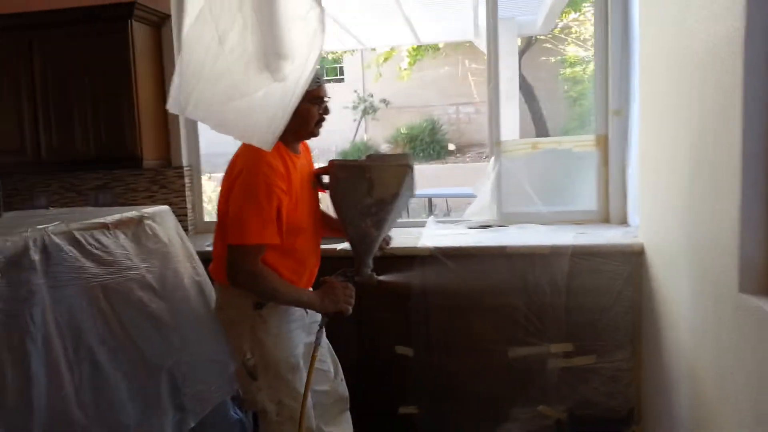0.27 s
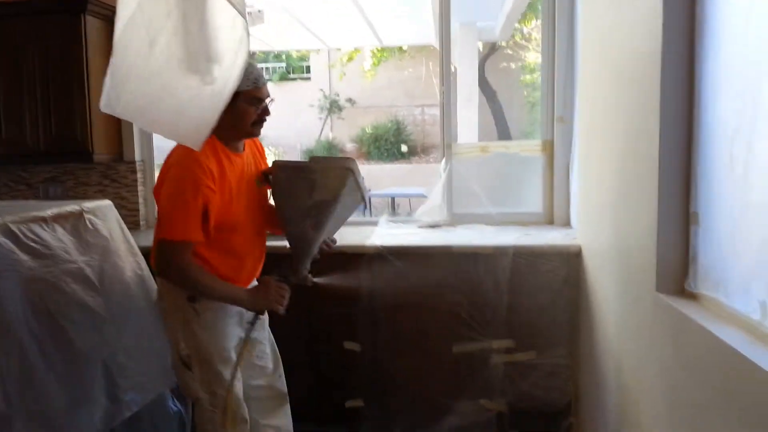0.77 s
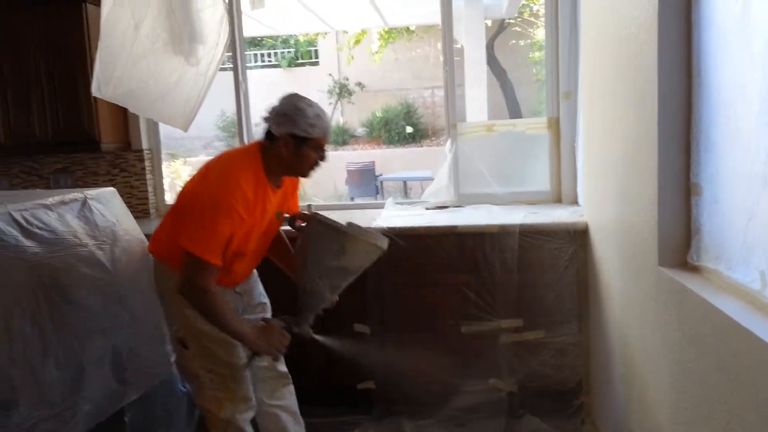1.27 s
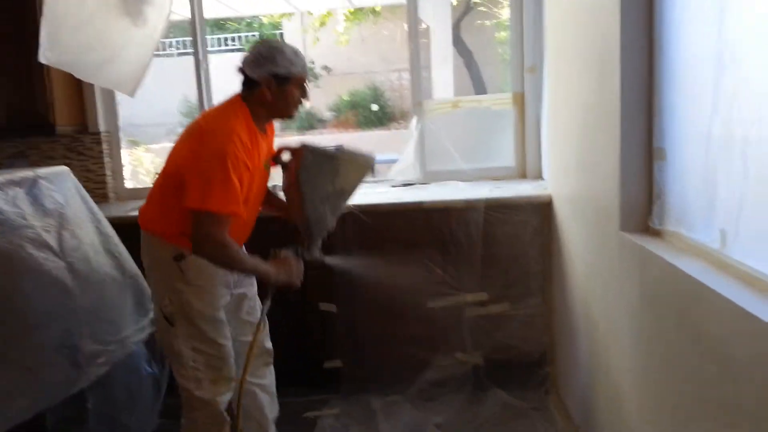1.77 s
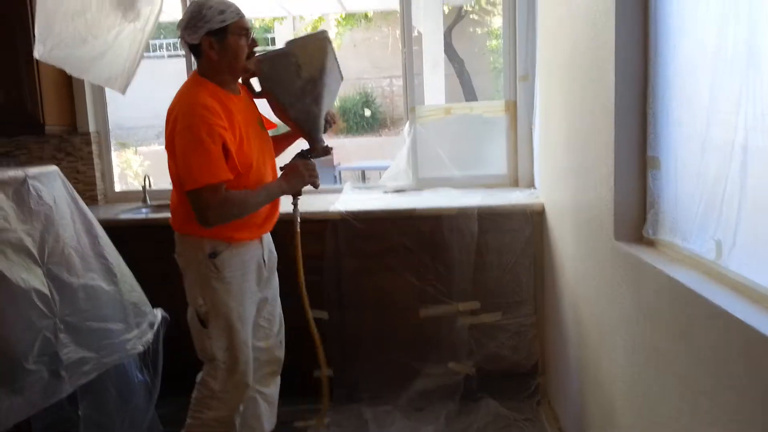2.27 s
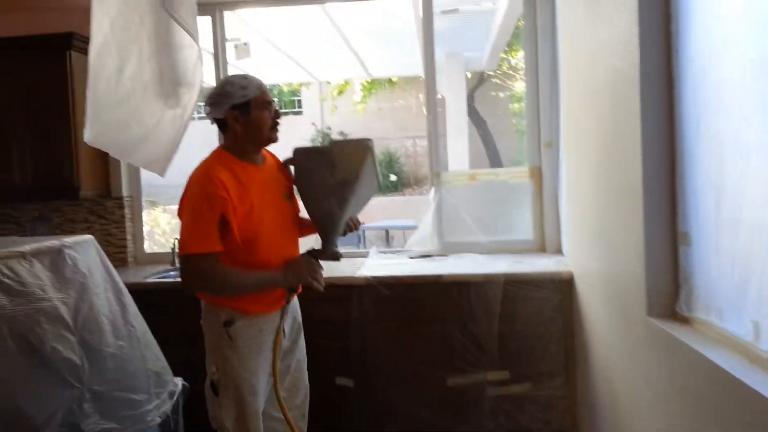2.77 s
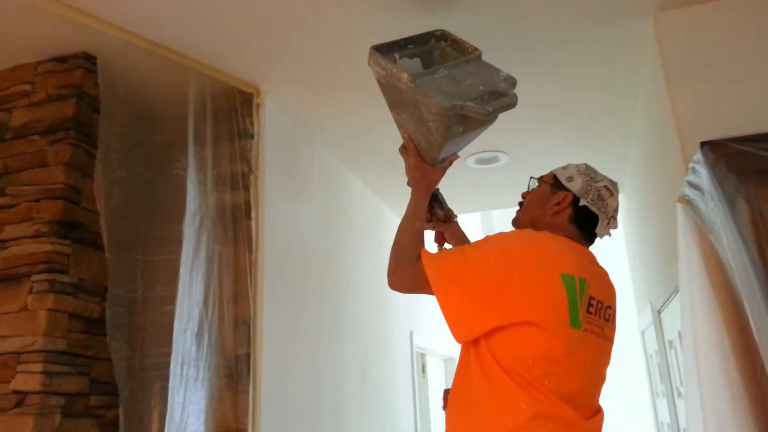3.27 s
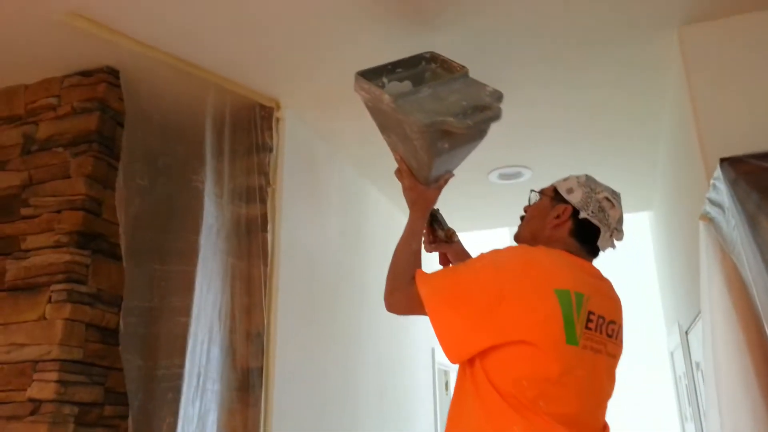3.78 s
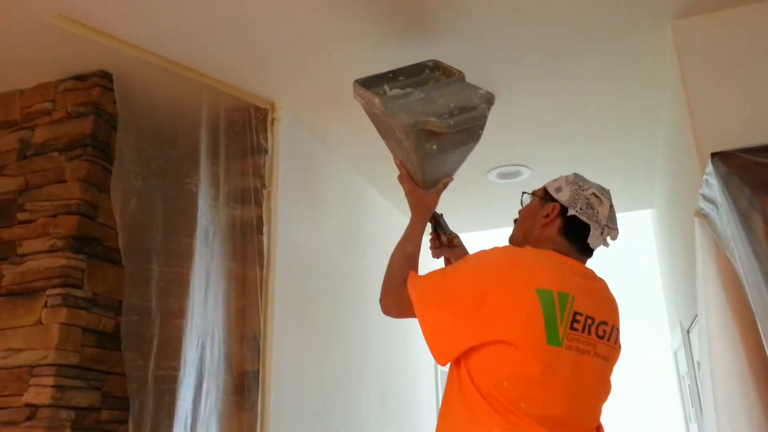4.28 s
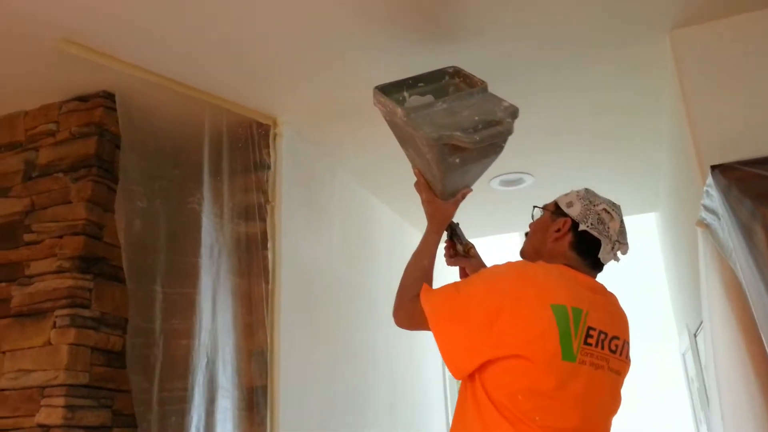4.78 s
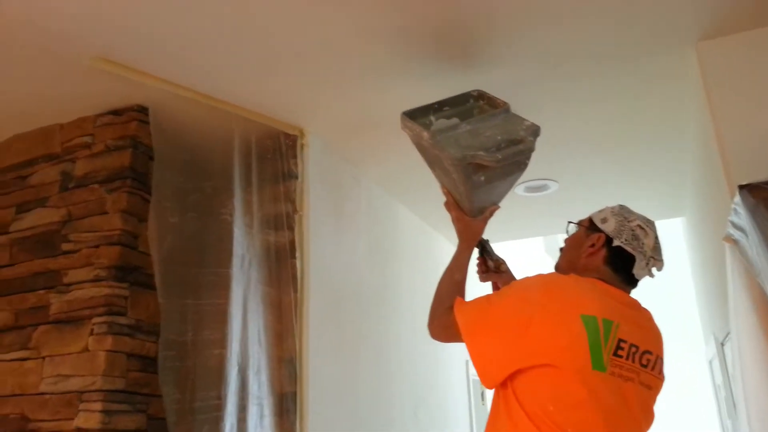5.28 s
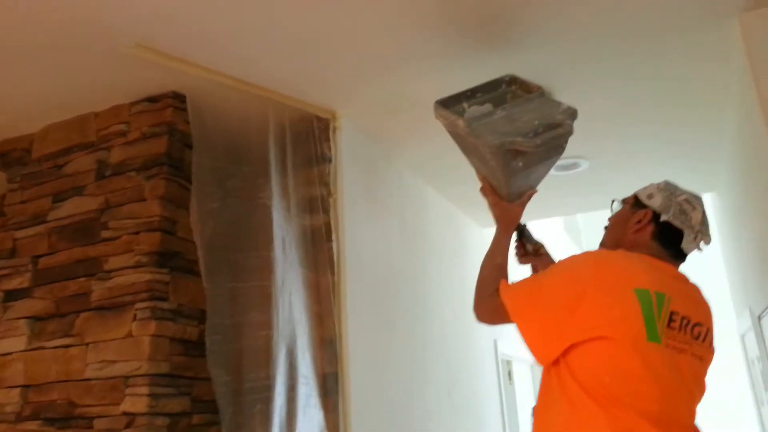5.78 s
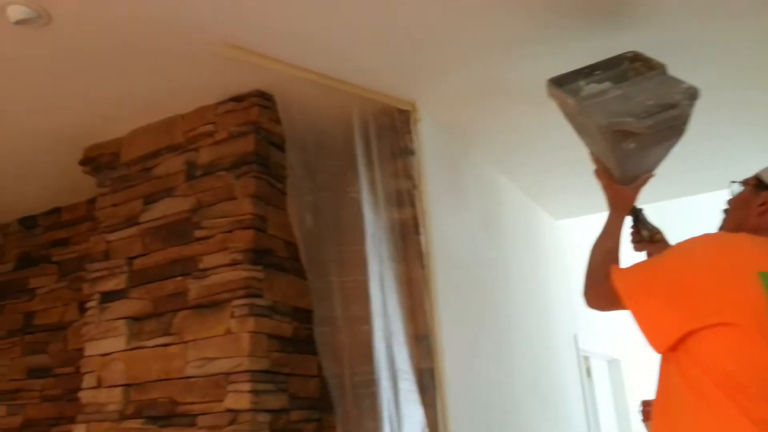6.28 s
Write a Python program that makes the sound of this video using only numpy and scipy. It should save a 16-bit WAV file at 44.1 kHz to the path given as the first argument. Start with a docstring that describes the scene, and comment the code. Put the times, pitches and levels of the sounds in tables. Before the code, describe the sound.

From the first instant a texture spray gun hisses hard in a kitchen, a bright rush strongest around 4 to 8 kHz, with grainy wet spatter beneath. A compressor drones steadily below, a buzzy low hum with a fundamental near 53 Hz and rapidly pulsing air. From 0 to 2 s short irregular bursts make the spray flutter, and a faint breathy whistle sinks slightly. At about 2.25 s a strong gust lasts roughly 0.2 s; the hiss brightens, the whistle leaps higher and stands out until 3 s, while spatter thins and the drone comes forward. Near 3.06 s, a soft low thump and an abrupt change to a hall. The hiss becomes steadier, the hum fuller, the spatter more midrange. Small dips recur, a breathy whistle rises gently around 4.4 to 5.6 s, then fades. Spray and drone continue to the cut at 6.5 s. Close handheld stereo, slightly pumping.

```python
"""A hopper gun sprays drywall texture in a kitchen: air hisses from the nozzle, a breathy whistle glides
in it, and the wet mix spatters as countless uneven droplets. All three are shaped noise.
The gun starts low; at about 2.2 s it is lifted and the hiss brightens, and soon the spatter is faint.
At about 3.1 s the scene changes suddenly to a hall, where the gun sprays the ceiling.
Throughout, a diaphragm compressor drones: a sum of harmonics, coloured by each room, plus a pulsing rush of air."""
import sys
import numpy as np
from scipy import signal
from scipy.fft import rfft, irfft, next_fast_len
from scipy.io import wavfile
from scipy.ndimage import uniform_filter1d, minimum_filter1d

SR = 44100
rng = np.random.default_rng(int(sys.argv[2]) if len(sys.argv) > 2 else 0)


def dump(signal):
    """Clip the signal to [-1, 1] and save it as 16-bit WAV at the path in sys.argv[1]."""
    limited = np.clip(np.atleast_2d(signal).T, -1, 1)
    pcm = np.round(limited * 32767).astype(np.int16)
    wavfile.write(sys.argv[1], SR, pcm)


N = 287973

# compressor speed before its slight wander: t/s, strokes/(1/s)
SPEED = [(0, 53.27), (3.0, 53.27), (3.2, 53.21), (6.53, 53.21)]
# how much stronger the left ear hears the hiss and spatter than the right, in each room: f/Hz, level/dB
EARS_KITCHEN = [(300, -7), (1500, 0.5), (2400, -2.5), (3400, 0.5), (4600, 10), (5400, 5), (6300, -5.5),
                (7100, -8.5), (8400, -9), (10000, -4), (12000, -3.5), (14500, 0)]
EARS_HALL = [(300, -7), (1200, -2.5), (2700, 4), (3600, -1), (4400, 5.5), (5000, 9), (5800, -4),
             (7100, -13), (8400, -8), (9600, -5), (11500, -5), (14500, -1)]


def air_jet(in_hall, gust_db=0.86):
    """Fast air turns turbulent and hisses; the colour of the hiss follows the aim of the gun."""
    # colour of the jet aimed low, lifted, and aimed at the ceiling: f/Hz, relative level per Hz/dB
    low_colour = [(60, -58), (2000, -16), (3300, -10.5), (4500, 1), (5500, 1), (7200, 1.5), (8400, -4.5),
                  (9500, -8.5), (12000, -12), (14500, -13)]
    lifted_colour = [(60, -53), (1500, -15), (3000, -12.5), (4000, -4.5), (4900, 2), (5600, 1.5),
                     (7200, 2.5), (8400, -5), (9500, -6.5), (11500, -11.5), (14500, -11.5)]
    ceiling_colour = [(200, -40), (2000, -25), (3300, -14), (4700, -0.5), (5500, 0), (6500, 2), (7300, -1),
                      (8200, -7), (9300, -12.5), (11500, -15), (14500, -25)]
    # left minus right while the gun is lifted: f/Hz, level/dB
    lifted_ears = [(300, -2), (1200, -2), (2400, 3), (3400, -1), (4600, 12), (5500, 3), (6300, -1.5),
                   (7100, -13), (8400, -6), (10000, -5), (12000, -4), (14500, 0)]
    low = room_noise(low_colour, EARS_KITCHEN)
    lifted = room_noise(lifted_colour, lifted_ears)
    kitchen = blend(low, lifted, after(2.25, 0.13))
    hiss = blend(kitchen, room_noise(ceiling_colour, EARS_HALL), in_hall)
    tone, tone_gain = whistle(lifted_ears)
    mixed = (hiss + tone_gain * tone) / np.hypot(1, tone_gain)   # same power with or without whistle
    return mixed * from_db(gust_db * drift(18))


def whistle(ears, width_hz=870):
    """A narrow band of turbulence at the nozzle makes a breathy tone that glides in pitch."""
    # course of the whistle: t/s, f/Hz, level relative to the hiss/dB
    course = [(0, 5150, -13), (.8, 4840, -18), (1.3, 4600, -10), (1.8, 4617, -7.5), (2.15, 4860, -7),
              (2.35, 5300, -10), (2.45, 7130, -7), (2.6, 6900, 2), (2.85, 6640, 0.5), (3.04, 6640, 1),
              (3.1, 6366, -22), (4.4, 5590, -8.5), (4.8, 6210, -9), (5.3, 6230, -7), (5.6, 6900, -19),
              (6.53, 6400, -24)]
    hz, level_db = in_time(course)
    narrow = signal.butter(2, width_hz / 2, fs=SR, output="sos")
    noise = rng.standard_normal((2, N)) + 1j * rng.standard_normal((2, N))
    sway = signal.sosfilt(narrow, noise)
    carrier = np.exp(2j * np.pi * np.cumsum(hz) / SR)   # moves the slow noise up to the whistle's pitch
    tone = rms_one((sway * carrier).real)
    pan = from_db(np.array([[1], [-1]]) * at_hz(ears, hz) / 2)
    return 2 * tone * pan / np.hypot(*pan), from_db(level_db)


def air_bursts(rise_s=0.0079, fall_s=0.03):
    """Short bursts of air through the nozzle raise the jet by some dB: each opens quickly, holds and closes."""
    # bursts: start t/s, length t/s, rise of the jet level/dB
    bursts = [(0.055, 0.062, 4.5), (0.133, .046, 5), (0.208, 0.023, 6), (.41, 0.033, 5.5), (.63, 0.026, 6),
              (0.676, .018, 4), (0.762, 0.026, 4.5), (0.849, .016, 7), (0.973, 0.029, 5),
              (1.106, 0.027, 5.5), (1.252, 0.049, 6), (1.392, 0.037, 5.5), (1.505, 0.036, 5),
              (1.637, .016, 2), (1.828, 0.026, 4.5), (2.209, 0.032, 6), (2.258, 0.22, 9), (2.609, 0.025, 6),
              (2.715, .028, 4), (2.982, .025, 1.5)]
    rise_db = np.zeros(N)
    for s, length_s, db in bursts:
        rise_db += db * (after(s, rise_s) - after(s + length_s, fall_s))
    return rise_db


def near_walls(x, sway_s=.00003, sway_rate_hz=0.43, creep=.00008):
    """Early echoes carve ripples into the hiss; they creep and sway as the gun moves, differently in each ear."""
    # surfaces near the gun: typical echo delay t/s, level/dB
    surfaces = [(.0013, -14), (.0023, -8.5), (.0034, -8.5), (.0052, -10.5), (.0078, -8), (0.0114, -9.5)]
    now, out = np.arange(N), x.copy()
    for ear in range(2):
        fine = signal.resample_poly(x[ear], 2, 1)   # twice as many points, for delays between samples
        for delay_s, db in surfaces:
            own_delay_s = delay_s * rng.uniform(.8, 1.2)
            lag = (own_delay_s + sway_s * drift(sway_rate_hz)) * SR
            lag += creep * rng.choice([-1, 1]) * now   # this surface comes nearer or recedes
            echo = np.interp(2 * (now - lag), np.arange(2 * N), fine, left=0, right=0)
            out[ear] += from_db(db) * echo
    return out * np.std(x) / np.std(out)


def spatter(in_hall, drop_spread_db=3.0, clump_db=1.5):
    """Countless droplets of uneven size leave the nozzle in clumps: noise of uneven strength, coloured by the room."""
    # colour of the spatter in each room: f/Hz, relative level per Hz/dB
    kitchen_colour = [(50, -22), (300, -3), (800, -7.5), (1200, -5), (1800, -5), (2400, -1), (3200, -4),
                      (4500, -0.5), (9000, -41)]
    hall_colour = [(60, -36), (300, -5), (900, 0.5), (1300, 4.5), (1550, 2.5), (1830, 7.5), (2150, 2.5),
                   (2450, 3.5), (3100, -1), (4500, 0), (9000, -17)]
    drops = from_db(drop_spread_db * rng.standard_normal(N) + clump_db * drift(21))
    kitchen = room_noise(kitchen_colour, EARS_KITCHEN, drops)
    hall = room_noise(hall_colour, EARS_HALL, drops)
    return blend(kitchen, hall, in_hall)


def compressor(turn, in_hall):
    """The same machine sends its drone into both rooms; each room colours it in its own way."""
    # drone at two places in the kitchen, then three in the hall: harmonic number, relative level/dB
    kitchen_edge = [(1, -38), (2, -15.5), (3, -7), (4, -11), (5, 8), (6, -22), (7, -2.5), (8, -4),
                    (9, -1.5), (10, -7), (11, 3.5), (12, -6), (13, -11), (14, 6), (15, 1), (16, -19),
                    (17, -15), (18, -21), (19, -10), (20, -29), (21, -32), (22, -34), (23, -15), (24, -17),
                    (25, -21), (26, -15), (27, -31), (28, -26), (29, -20), (30, -30), (31, -20)]
    kitchen_inside = [(1, -41), (2, -13), (3, -4), (4, -16), (5, 1), (6, -6.5), (7, 0.5), (8, -9), (9, -8),
                      (10, -2.5), (11, -2), (12, -45), (13, -3.5), (14, -16), (15, -9), (16, -13.5),
                      (17, -9), (18, -12), (19, -11.5), (20, -21), (21, -31), (22, -63), (23, -20),
                      (24, -26), (25, -15), (26, -18), (27, -17), (28, -24), (29, -43), (30, -11.5),
                      (31, -18)]
    hall_entry = [(1, -42), (2, -17), (3, -18.5), (4, -19), (5, -10), (6, -3.5), (7, -13.5), (8, -9.5),
                  (9, -26), (10, 0), (11, -7.5), (12, -7), (13, -14), (14, -10), (15, -25), (16, -33),
                  (17, -20), (18, -15.5), (19, -26), (20, -19), (21, -24), (22, -30), (23, -14), (24, -29),
                  (25, -8), (26, -18), (27, -30), (28, -21), (29, -24), (30, -35), (31, -34), (32, -14),
                  (33, -24), (34, -19)]
    hall_inside = [(1, -41), (2, -17), (3, -19), (4, -20.5), (5, -9), (6, -2), (7, -10.5), (8, -7.5),
                   (9, -20.5), (10, 1.5), (11, -6.5), (12, -4.5), (13, -15), (14, -13), (15, -12.5),
                   (16, -28), (17, -18.5), (18, -13), (19, -29), (20, -32), (21, -24), (22, -39),
                   (23, -15.5), (24, -25), (25, -20.5), (26, -50), (27, -20), (28, -23), (29, -25),
                   (30, -31), (31, -45), (32, -15.5), (33, -28), (34, -31)]
    hall_edge = [(1, -38), (2, -10.5), (3, -12), (4, -11.5), (5, -3), (6, -7), (7, 2.5), (8, -28), (9, -1),
                 (10, 0), (11, -0.5), (12, -7), (13, -1), (14, 7), (15, -30), (16, -25), (17, -11),
                 (18, -27), (19, -31), (20, -19), (21, -37), (22, -35), (23, -10), (24, -12), (25, -5),
                 (26, -26), (27, -13), (28, -33), (29, -28), (30, -32), (31, -30), (32, -21), (33, -17),
                 (34, -27)]
    # the listener's path between those places: t/s, place counted from 0
    kitchen_path = [(0, 0.25), (.25, 0.27), (.8, 0.92), (3.1, 0.95)]
    hall_path = [(3.0, 0.2), (3.5, 0.22), (4.3, 0.88), (5.551, 0.93), (6.3, 1.7), (6.53, 1.6)]
    # exhaust and intake puffs reaching each room: place in the cycle 0-1, ringing f/Hz, width f/Hz, pressure
    kitchen_puffs = [(.86, 300, 160, 1), (.21, 600, 150, .9)]
    hall_puffs = [(.72, 540, 200, 1), (.37, 350, 300, .7)]
    kitchen = drone(turn, kitchen_puffs, [kitchen_edge, kitchen_inside], kitchen_path,
                    ear_spread=0.4, left_db=0.6)
    hall = drone(turn, hall_puffs, [hall_entry, hall_inside, hall_edge], hall_path,
                 ear_spread=0.41, left_db=4.0)
    return blend(kitchen, hall, in_hall)


def drone(turn, puffs, places, path, ear_spread, left_db, waver_db=.5, flutter=0.045):
    """Two ringing puffs a stroke set when each harmonic arrives; standing waves set how loud it is."""
    treble_lead = .04   # cycles: the house passes treble sooner; lead of each harmonic over the one below
    echo_scatter = .15   # radians: echoes jostle the arrival of each harmonic
    place, = in_time(path)
    orders = np.arange(1, len(places[0]) + 1)
    hz = orders * SPEED[0][1]
    stroke = np.zeros(len(orders), complex)
    for at, ring_hz, width_hz, push in puffs:
        ringing = 1 + 1j * (hz ** 2 - ring_hz ** 2) / (hz * width_hz)
        stroke += push * np.exp(-2j * np.pi * orders * at) / ringing
    phases = np.angle(stroke) + np.pi * treble_lead * orders ** 2
    phases += echo_scatter * rng.standard_normal(len(orders))
    gains = from_db(np.array(places)[:, :, 1]).T
    gains = gains / np.sqrt(np.sum(gains ** 2, axis=0))   # equal power at every place
    out = np.zeros((2, N))
    for k, gain, phase in zip(orders, gains, phases):
        shortness = min(k / 10, 2)   # short waves reach the two ears differently
        apart = np.float32(ear_spread * shortness * rng.choice([-1, 1]))
        ears = from_db(left_db * min(shortness, 1) * np.array([[.5], [-.5]]))
        level = np.interp(place, np.arange(len(gain)), gain) * from_db(waver_db * drift(0.71))
        angle = 2 * np.pi * (k * turn % 1) + phase + flutter * drift(14)
        angle = angle.astype(np.float32)
        out += ears * level * np.cos([angle + apart, angle - apart])
    return np.sqrt(2) * out


def intake(turn, pulsing=0.53):
    """Air rushing through the compressor: breathy noise that swells once a stroke."""
    # colour of the rush: f/Hz, relative level per Hz/dB
    colour = [(20, -24), (35, -20), (50, -23), (80, -7), (200, -5), (300, 2), (550, 5), (800, -4.5),
              (1200, -21), (2500, -43)]
    swell = 1 + pulsing * np.cos(2 * np.pi * turn)
    return room_noise(colour, [(100, 0), (500, 1.8)], swell)


def thumps(hz=48, decay_s=0.0064):
    """Soft low thumps: each is a sine that damping stops almost at once; the last comes as the scene changes."""
    # thumps: t/s, level before the damping/dB; the last one falls on the sudden change of scene
    thuds = [(.405, -35), (2.255, -41), (3.062, -28)]
    out = np.zeros(N)
    for s, db in thuds:
        age = np.clip(np.arange(N) / SR - s, 0, 1)
        out += from_db(db) * np.sin(2 * np.pi * hz * age) * np.exp(-age / decay_s)
    return out


def dips(width_s=0.022):
    """A gain that makes the level dip briefly, each time along a bell-shaped curve."""
    # dips: middle t/s, depth level/dB
    moments = [(1.125, 2), (2.245, 3), (2.64, 1.5), (2.74, 0), (3.035, 1.5), (3.33, 2.5), (3.635, 3),
               (3.785, 3), (4.255, 3.5), (4.445, 1), (4.533, 1.5), (4.83, 1), (5.0, 2.5), (5.14, 0.5),
               (5.64, 2), (5.795, 1), (6.22, 2), (6.495, 1)]
    t = np.arange(N) / SR
    depth_db = sum(db * np.exp(-((t - s) / width_s) ** 2) for s, db in moments)
    return from_db(-depth_db)


def gain_control(x):
    """Turns everything down while the sound is loud, holds, then recovers: the drone ducks under loud air."""
    threshold_db, squeeze = -11.5, 0.88   # where it starts; share of the excess dB it takes away
    sense_s, hold_s, attack_s = 0.0099, .012, 0.0024
    release_db_per_s = 202
    power = uniform_filter1d(np.mean(x ** 2, axis=0), int(sense_s * SR))
    level_db = 10 * np.log10(np.abs(power) + 1e-12)
    cut_db = squeeze * np.maximum(level_db - threshold_db, 0)
    half = int(hold_s * SR / 2)
    held = -minimum_filter1d(-cut_db, 2 * half + 1, origin=half)   # greatest cut within the hold time
    recovery = release_db_per_s * np.arange(N) / SR
    released = np.maximum.accumulate(held + recovery) - recovery   # the cut falls no faster than the release
    r = np.exp(-1 / (attack_s * SR))
    smooth_cut_db = signal.lfilter([1 - r], [1, -r], released)
    return x * from_db(-smooth_cut_db)


def room_noise(spectrum, ears, excitation=1):
    """Noise scattered about a room reaches the ears partly alike; coloured, with a centre of spread 1."""
    # likeness of the left and right sound: f/Hz, likeness from -1 (opposite) to 1 (same)
    likeness = [(30, 0.28), (150, 0.046), (500, 0.62), (900, 0.8), (1400, -0.3), (2300, 0.31), (3200, 0),
                (5000, 0.19), (14000, -0.094)]
    size = next_fast_len(N, True)
    hz = np.arange(size // 2 + 1) * SR / size
    mid, side = rfft(rng.standard_normal((2, N)) * excitation, size)
    alike = np.clip(at_hz(likeness, hz), -1, 1)
    sign = np.array([[1], [-1]])   # left, right
    pan = from_db(sign * at_hz(ears, hz) / 2)
    pair = np.sqrt(1 + alike) * mid + sign * np.sqrt(1 - alike) * side
    pair = pair * pan / np.hypot(*pan)
    out = irfft(pair * from_db(at_hz(spectrum, hz)), size)[:, :N]
    return out / np.std(out.mean(axis=0))


def drift(rate_hz):
    """Slow random wandering of rms 1: noise smoothed twice, made at every 40th sample."""
    r = np.exp(-80 * np.pi * rate_hz / SR)
    noise = rng.standard_normal(N // 40 + 2002)
    slow = signal.lfilter([1], [1, -2 * r, r * r], noise)[2000:]   # skip the start-up
    return np.interp(np.arange(N) / 40, np.arange(len(slow)), rms_one(slow))


def blend(a, b, share):
    """Equal-power change from sound a to sound b."""
    return np.sqrt(1 - share) * a + np.sqrt(share) * b


def after(s, fade_s):
    """Rises from 0 to 1 around time s."""
    return np.clip((np.arange(N) / SR - s) / fade_s + .5, 0, 1)


def in_time(rows):
    """Each column of a curve, sample by sample."""
    s, *columns = np.transpose(rows)
    return [np.interp(np.arange(N) / SR, s, c) for c in columns]


def at_hz(points, hz):
    """Read a curve on a log-frequency axis."""
    f, value = np.transpose(points)
    return np.interp(np.log(np.maximum(hz, 1)), np.log(f), value)


def rms_one(x):
    """Scale to rms 1."""
    return x / np.sqrt(np.mean(x ** 2) + 1e-20)


def from_db(db):
    """Decibels to gain."""
    return 10 ** (np.asarray(db) / 20)


def scene():
    """Gun and compressor together, first in the kitchen and then in the hall."""
    # the trigger, as the flow it lets through: t/s, air jet level/dB, spatter level/dB
    trigger = [(0, -15.5, -24.5), (.4, -16.5, -25.5), (.7, -13.5, -22.5), (2.2, -16, -24),
               (2.5, -16.5, -26), (2.7, -18, -30.5), (3.05, -18.5, -32), (3.075, -16, -25),
               (4.2, -18, -26.5), (5.2, -18, -26.5), (6.53, -19, -25.5)]
    # compressor loudness while the listener moves about the kitchen: t/s, level/dB
    kitchen_level = [(0, -21), (.4, -19.5), (.7, -20.5), (2.2, -22), (2.55, -18.5), (3.05, -19)]
    hall_db, intake_db = -16, -14.5   # steady drone in the hall; intake relative to the drone
    in_hall = after(3.064, 0.0044)   # the sudden change of scene

    jet_db, spatter_db = in_time(trigger)
    jet = from_db(jet_db + air_bursts()) * near_walls(air_jet(in_hall))
    gun = jet + from_db(spatter_db) * spatter(in_hall)

    speed, = in_time(SPEED)
    turn = np.cumsum(speed * (1 + .0002 * drift(2.5))) / SR   # strokes so far
    kitchen_db, = in_time(kitchen_level)
    drone_db = kitchen_db + in_hall * (hall_db - kitchen_db)
    machine = compressor(turn, in_hall) + from_db(intake_db) * intake(turn)
    machine = from_db(drone_db) * machine
    return (machine + gun) * dips() + thumps()


def record(dry):
    """The gain is ridden, the highest peaks are rounded and the top is cut steeply."""
    level = gain_control(dry)
    rounded = level / (1 + (level / .85) ** 8) ** (1 / 8)
    top_cut = signal.ellip(12, .1, 90, 14450, fs=SR, output="sos")   # passes up to 14450 Hz
    return signal.sosfilt(top_cut, rounded)


dry = scene()
out = record(dry)
dump(out)
```